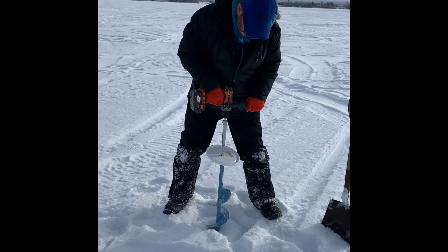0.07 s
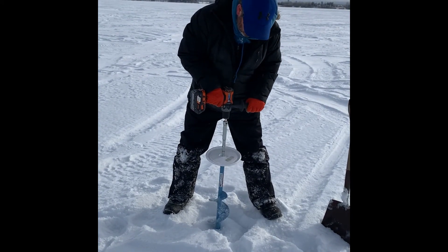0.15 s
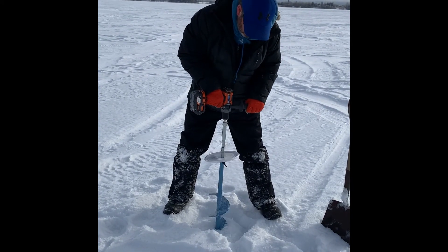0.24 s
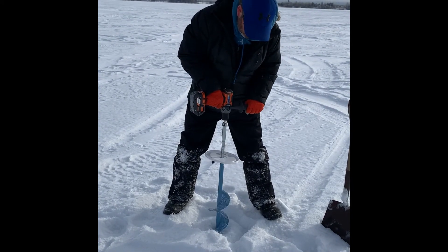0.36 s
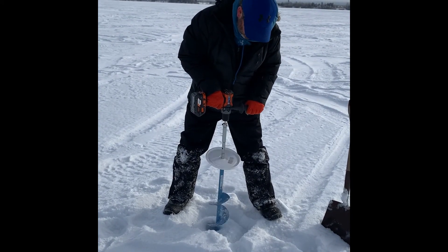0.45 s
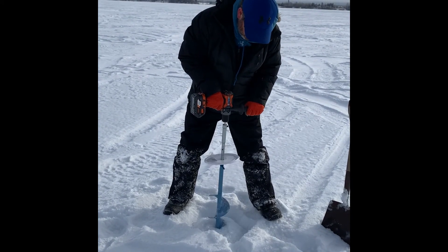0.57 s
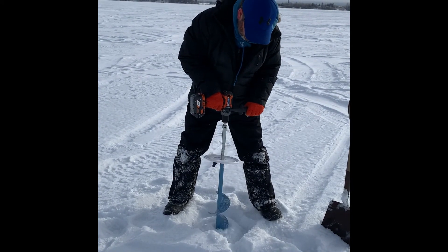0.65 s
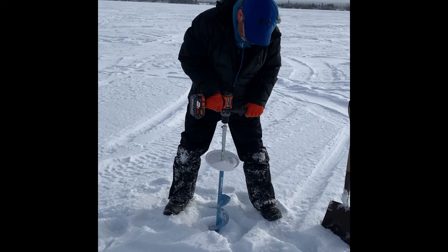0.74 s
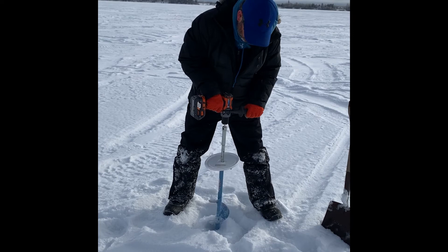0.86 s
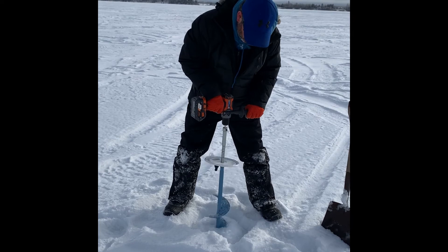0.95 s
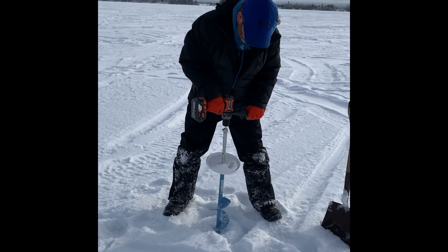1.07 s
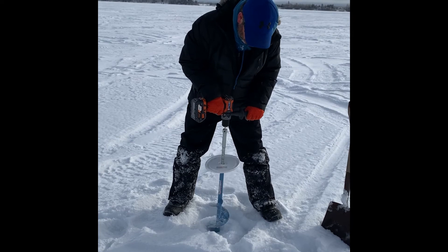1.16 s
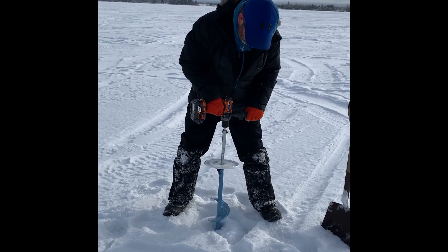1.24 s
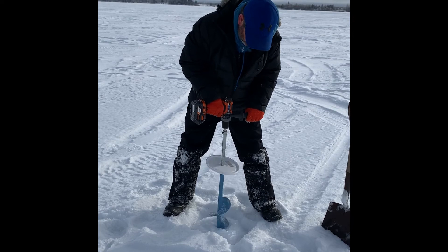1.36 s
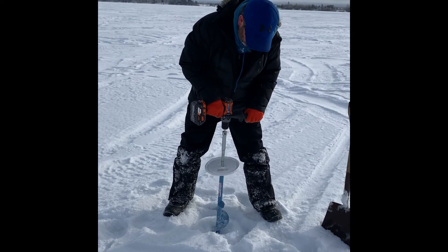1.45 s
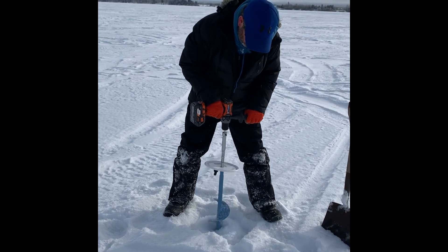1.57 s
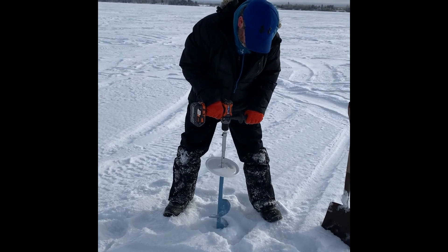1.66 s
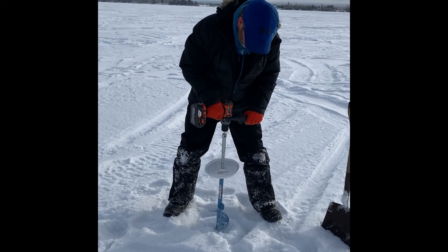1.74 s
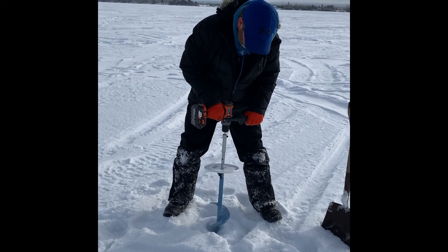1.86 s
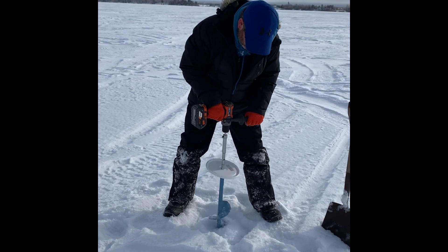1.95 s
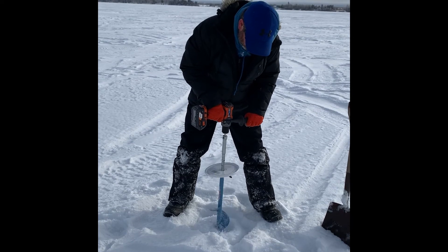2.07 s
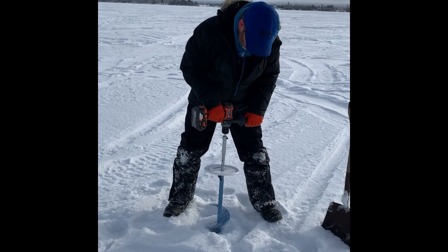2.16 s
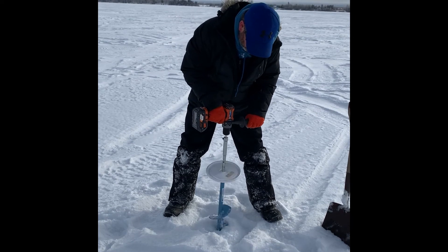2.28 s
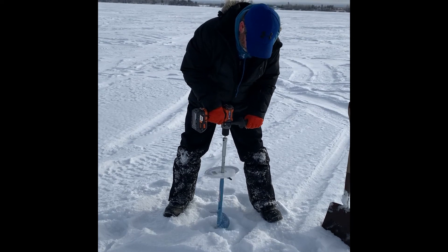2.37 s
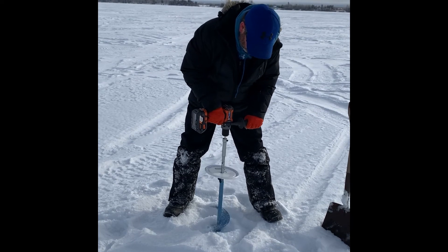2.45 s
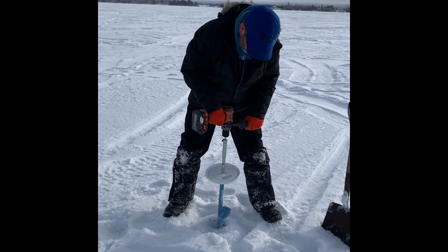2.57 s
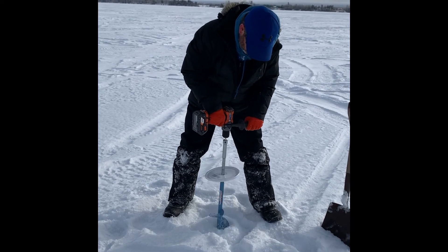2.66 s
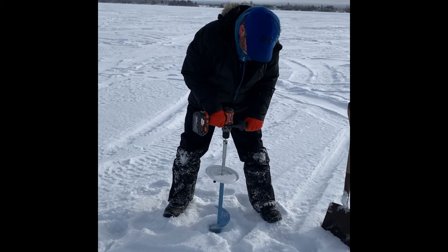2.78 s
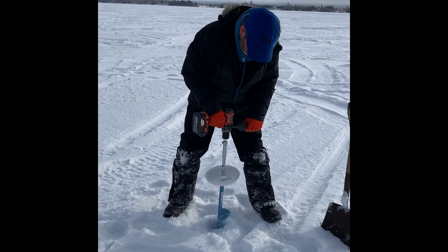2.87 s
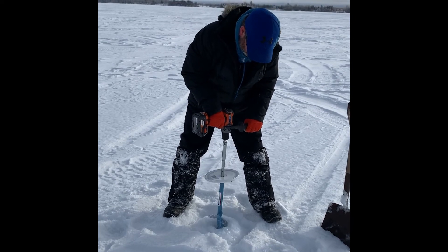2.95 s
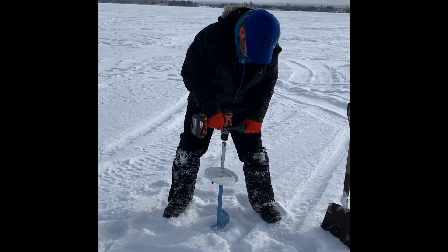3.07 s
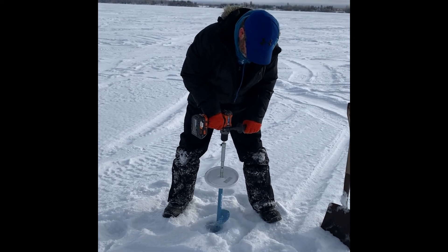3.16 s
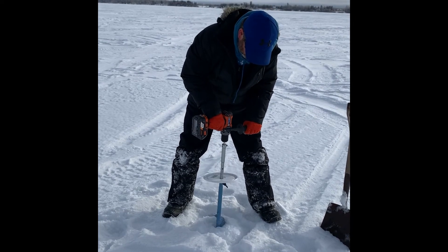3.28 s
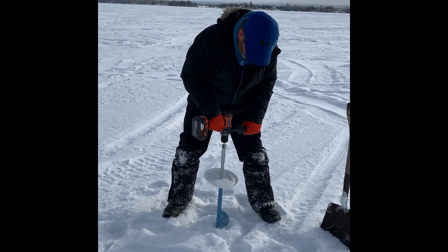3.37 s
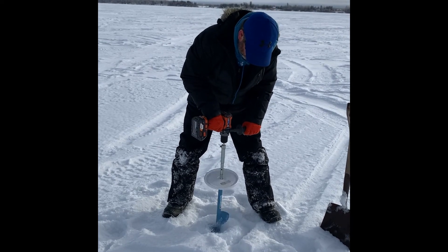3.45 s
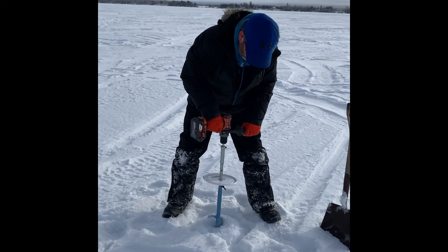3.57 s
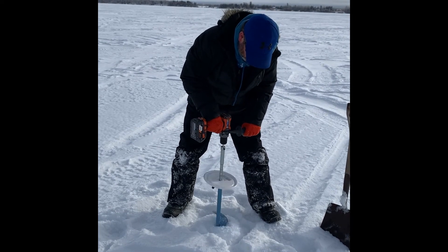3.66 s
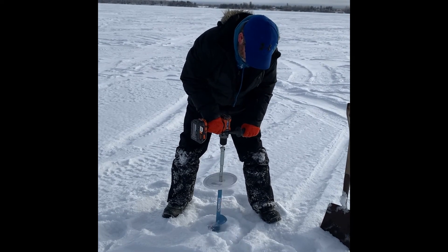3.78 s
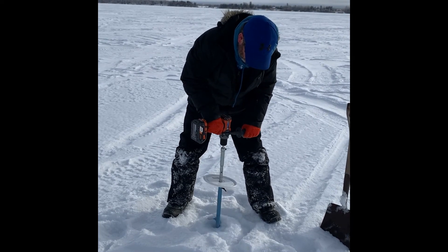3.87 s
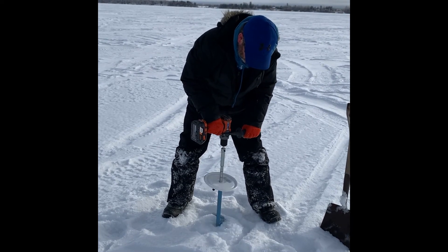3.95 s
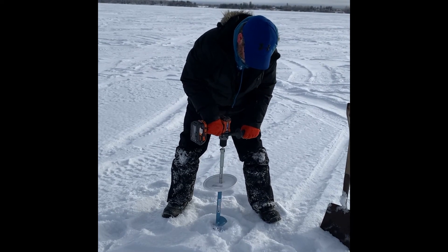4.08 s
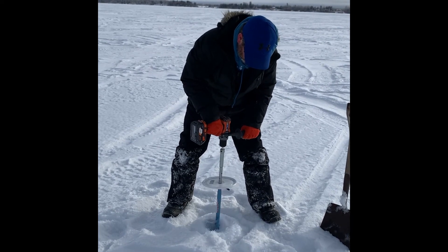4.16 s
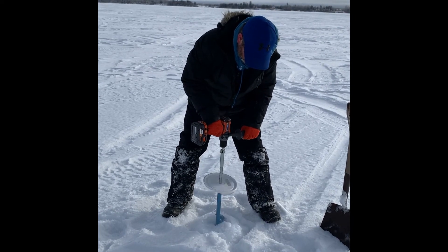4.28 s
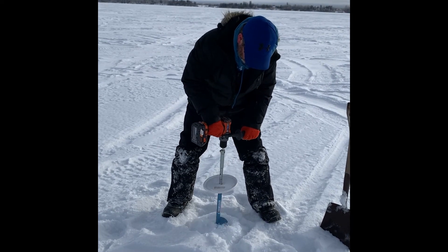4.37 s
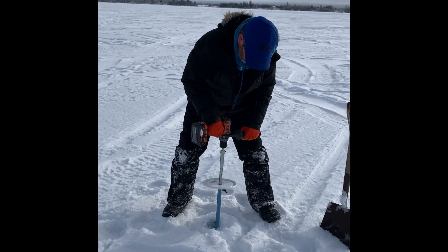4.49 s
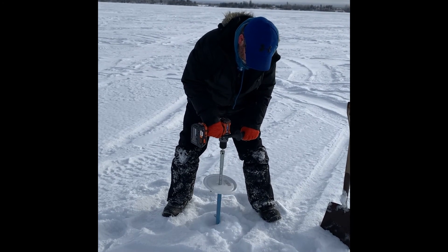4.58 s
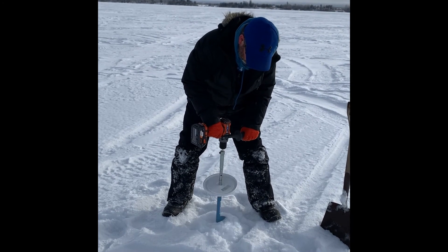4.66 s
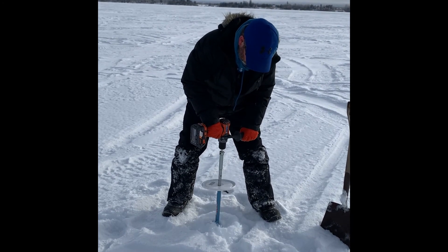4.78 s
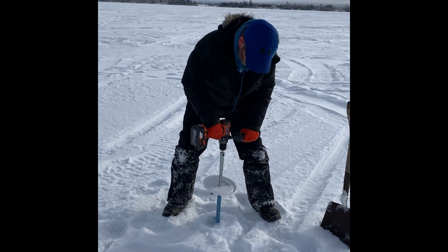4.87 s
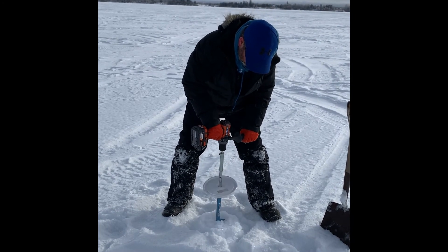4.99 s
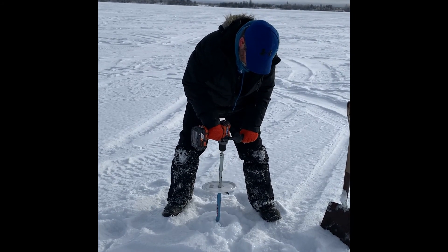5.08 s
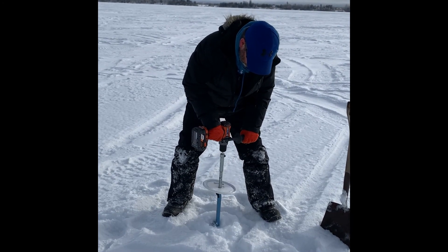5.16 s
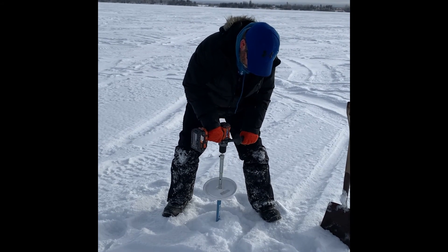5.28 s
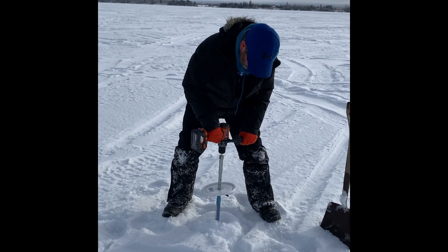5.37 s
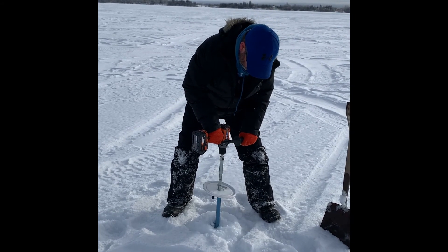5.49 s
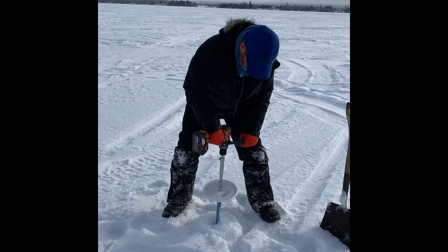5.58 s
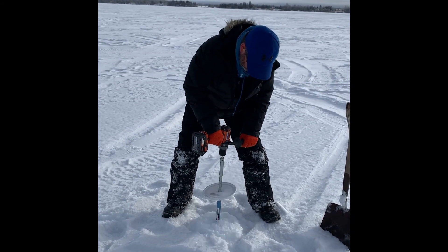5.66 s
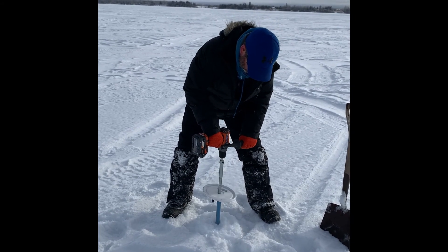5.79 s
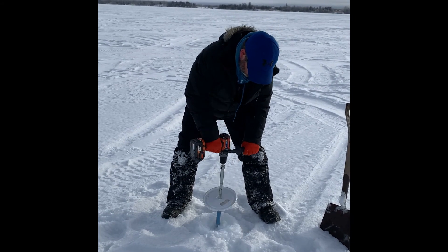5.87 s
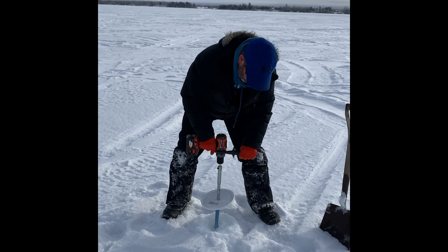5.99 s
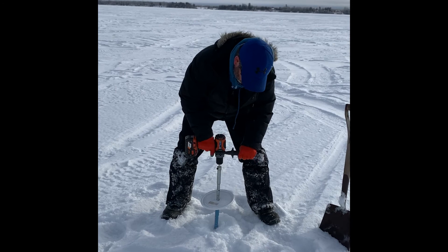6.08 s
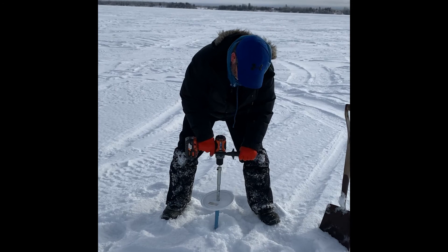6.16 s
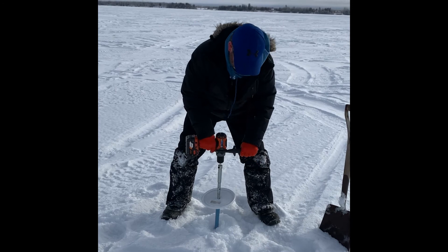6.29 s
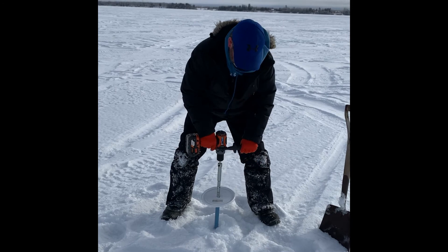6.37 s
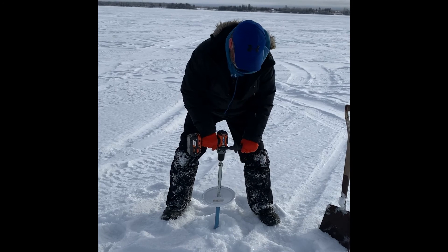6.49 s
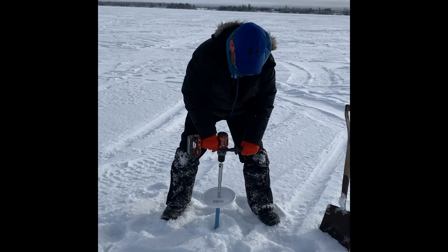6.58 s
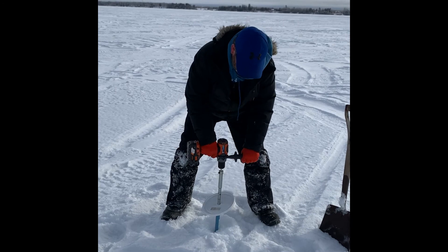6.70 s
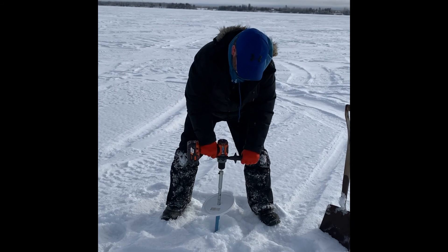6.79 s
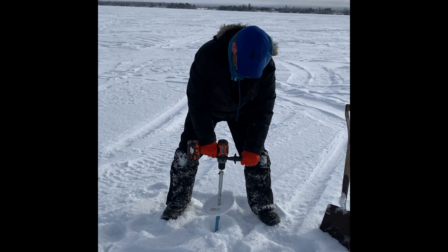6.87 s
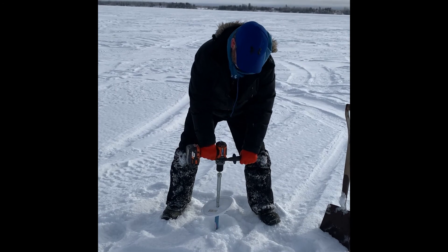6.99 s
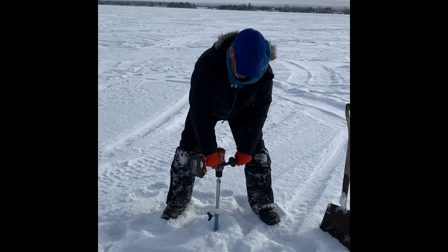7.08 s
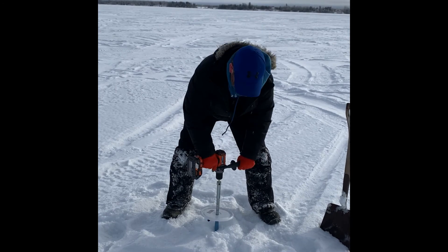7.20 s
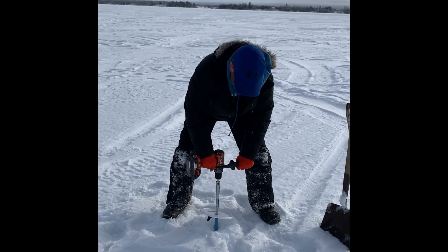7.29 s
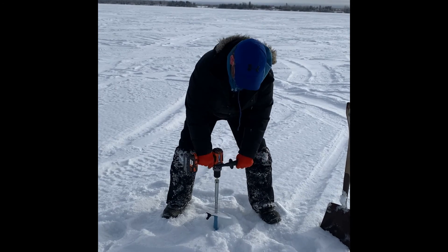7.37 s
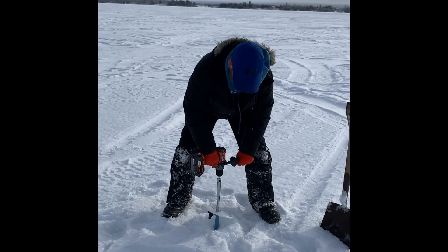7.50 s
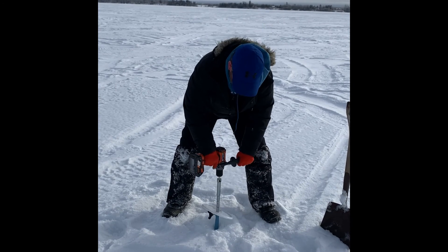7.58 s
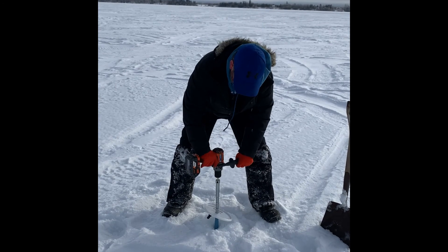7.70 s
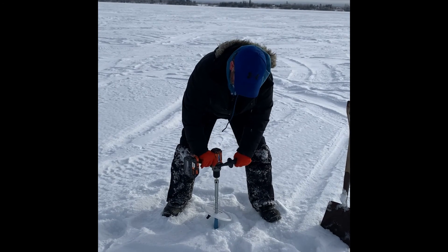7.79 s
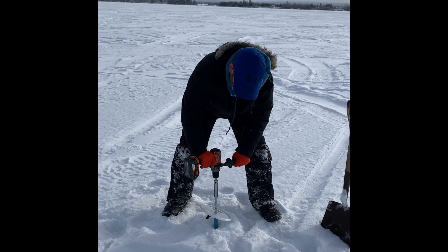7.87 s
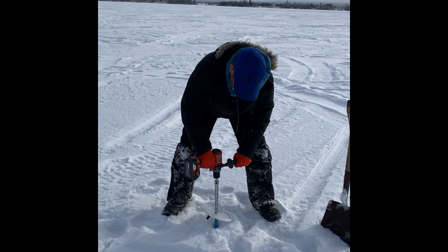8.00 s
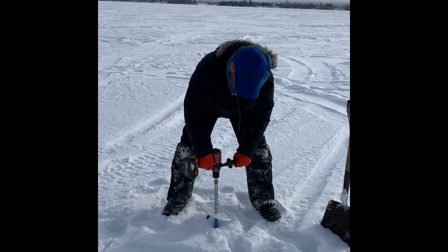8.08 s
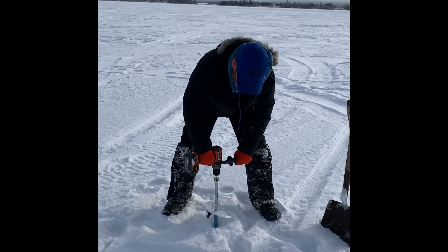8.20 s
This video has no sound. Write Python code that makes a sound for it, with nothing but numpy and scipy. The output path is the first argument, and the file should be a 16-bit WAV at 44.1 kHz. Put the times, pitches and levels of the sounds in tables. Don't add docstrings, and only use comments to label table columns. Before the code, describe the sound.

Outdoors on a snowy frozen lake, heard in dry stereo by a phone a short way off. From 0 to 5.85 s a cordless drill bores an auger through ice: a loud, rough gear whine around 3 kHz, rising slightly near 1.7 s and dipping in quick jerks as blades catch. Broad hiss, grating ice shaving and a thin high whistle surround it; the cutting slowly softens while low rumble from the ice sheet grows. At 5.85 s it breaks through, and the motor brakes to a stop by 6 s with rattles and cracks. Then quiet: knocks, scrapes and wet-sounding crunches around 6.3 and 6.7-6.85 s. At 7.0-7.22 s a short squeeze chirps, whirrs up and down, with a sharp metallic clack near 7.11. Small ticks and snow crunches follow, a clear knock at 7.94, then faint taps to about 8.2 s. Faint low wind buffets throughout.

```python
import sys
import numpy as np
from scipy import signal
from scipy.fft import rfft, irfft, next_fast_len
from scipy.io import wavfile
from scipy.ndimage import uniform_filter1d, map_coordinates

SR = 44100
rng = np.random.default_rng(int(sys.argv[2]) if len(sys.argv) > 2 else 0)


def nominal_scale(level):
    x = np.asarray(level, float) / 20
    return 10 ** x


def to_wav(sig):
    pcm = np.clip(np.atleast_2d(sig), -1, 1) * 32767
    pcm = np.round(pcm).astype(np.int16)
    wavfile.write(sys.argv[1], SR, pcm.T)


N = 363384
FREE_S = 6.5


def unit(x):
    return x / np.sqrt(np.mean(x ** 2) + 1e-20)


def along(points, hz):
    f, v = np.transpose(points)
    return np.interp(np.log(hz + 1), np.log(f + 1), v)


def curves(rows):
    s, *cols = np.transpose(rows)
    return [np.interp(np.arange(N) / SR, s, c) for c in cols]


def wobble(rate):
    knots = rng.standard_normal(int(N * rate / SR) + 4)
    return map_coordinates(knots, [np.arange(N) * rate / SR])


def swell(peak_s, fall_s, rise_share):
    t = np.arange(N) / SR - peak_s
    return np.exp(-np.log(10) / max(fall_s, .004) * np.where(t > 0, t, -t / max(rise_share, .05)))


def filtered(x, response):
    m = next_fast_len(N + SR // 2)
    return irfft(rfft(x, m) * response(np.fft.rfftfreq(m, 1 / SR)), m)[..., :N]


def rush(spectrum, grit_db, rate):
    lumpy = rng.standard_normal(N) * nominal_scale(grit_db * wobble(rate))
    return unit(filtered(lumpy, lambda hz: nominal_scale(along(spectrum, hz))))


def patchy(x, depth_db, size):
    z = signal.stft(x, nperseg=512)[2]
    field = uniform_filter1d(rng.standard_normal(z.shape), size[0], 0)
    field = uniform_filter1d(field, size[1], 1)
    return signal.istft(z * nominal_scale(depth_db * unit(field)), nperseg=512)[1][:N]


def tone(turns, rough):
    return unit(nominal_scale(2.2 * wobble(75)) * np.sin(turns + rough * wobble(200)))


def drill():
    # frequency in Hz, level in dB.
    hiss_spectrum = [(1500, -30), (2600, -4), (3600, .5), (4300, -.5), (4700, 1), (5400, -1.5),
                     (6300, -2.5), (7500, -6), (8400, -3.5), (9200, -6.5), (10300, -5), (11000, -9),
                     (13000, -11), (16000, -14.5)]
    grind_spectrum = [(90, -33), (150, 0.5), (230, 0), (380, -4), (500, -6.5), (1000, -6), (2000, -38)]
    boom_spectrum = [(30, -29.5), (65, -4), (110, 1), (150, -2.5), (220, -31)]
    mesh_hz, mesh_db, (hiss_db, cut_db, grind_db, boom_db) = work()
    mesh_hz = mesh_hz * (1 + .001 * wobble(8) + .002 * wobble(21))
    mesh_db = mesh_db + .6 * wobble(9)
    free_db = 11 * (np.arange(N) > FREE_S * SR)
    mesh_hz = mesh_hz * (1 + nominal_scale(-free_db / 2) * (.009 * wobble(52) + .003 * wobble(110)))
    turns = 2 * np.pi * np.cumsum(mesh_hz) / SR
    beat = 1 + .2 * np.cos(turns / 40)
    turns = turns + .5 * np.sin(turns / 40 + .8 * np.sin(turns / 40))
    pinion = np.maximum(np.cos(turns / 100), 0) ** 3
    gears = gear_tones(turns, mesh_db, hiss_db, free_db)
    hiss_gain = nominal_scale(hiss_db + 1.5 * pinion - free_db / 4 + 0.99 * wobble(15))
    hiss = hiss_gain * rush(hiss_spectrum, grit_db=-0.5, rate=260)
    blades = cutting(turns, cut_db, pinion)
    grind = nominal_scale(grind_db + 3) * rush(grind_spectrum, grit_db=1.2, rate=44)
    boom = nominal_scale(boom_db + 3) * rush(boom_spectrum, grit_db=0, rate=20)
    return beat * gears + hiss + blades + slack_gears() + grind + boom


def work():
    # time in seconds, tooth mesh in Hz, mesh tone in dB.
    cut = [(0.0, 3030, -42.5), (0.25, 3046, -42), (0.5, 2947, -46), (0.82, 3050, -41), (1.15, 2970, -41.5),
           (1.45, 3030, -41), (1.68, 3278, -41.5), (2.3, 3253, -38), (2.5, 3280, -39.5),
           (2.84, 3307, -39.5), (3.3, 3322, -43), (3.57, 3290, -43.5), (3.72, 3246, -43.5),
           (4.2, 3235, -42), (4.8, 3125, -41.5), (5.04, 3250, -40.5), (5.4, 3240, -39), (5.78, 3240, -39)]
    # time in seconds, tooth mesh in Hz, mesh tone in dB, effort in dB.
    brake = [
        (5.851, 3334, -42, 0),
        (5.89, 2950, -39, 2),
        (5.91, 2674, -57, 4),
        (5.93, 2200, -60, 0.5),
        (5.95, 1710, -66, -7.5),
        (5.975, 1100, -91, -14),
        (6.0, 980, -100, -24.5),
    ]
    # time in seconds, tooth mesh in Hz, mesh tone in dB, effort in dB.
    squeeze = [
        (7.004, 1100, -88, -50),
        (7.017, 1796, -55, -39),
        (7.035, 2200, -50, -28.5),
        (7.075, 2990, -53.5, -30),
        (7.1, 3118, -50, -26),
        (7.122, 2847, -42.5, -28),
        (7.15, 2765, -41, -28),
        (7.2, 2396, -48, -32),
        (7.225, 2000, -100, -49.5),
    ]
    # time in seconds, mesh drop in Hz.
    snags = [(.15, 90), (.47, 90), (.8, 60), (1.06, 130), (1.3, 60), (2.15, 80), (2.41, 170), (2.51, 230),
             (2.58, 140), (2.69, 150), (3.36, 100), (3.54, 190), (3.63, 100), (3.71, 100), (3.84, 140),
             (3.92, 150), (4.01, 130), (4.17, 200), (4.235, 190), (4.37, 100), (4.44, 110), (4.5, 170),
             (4.6, 70), (4.72, 150), (4.81, 150), (4.85, 130), (4.98, 140), (5.09, 140), (5.14, 210),
             (5.2, 110), (5.27, 70), (5.47, 150), (5.55, 130), (5.6, 180), (5.73, 120)]
    # dB at the surface, dB at the hole bottom, bend of the change,
    # dB under the effort running free, dB per octave of free speed.
    layers = [
        (-28.5, -33, 0.93, 0.1, 0),
        (-27.5, -33.5, 0.65, -11, 9),
        (-45, -47, 0.7, -21, 18),
        (-65.5, -47.5, 0.49, -26, 21),
    ]
    t, through_s = np.arange(N) / SR, 5.85
    mesh_hz, mesh_db = curves(cut + [r[:3] for r in brake + squeeze])
    still = [(brake[-1][0] + .02, 0, 0, -120), (squeeze[0][0] - .003, 0, 0, -120)]
    end = [(squeeze[-1][0] + .02, 0, 0, -120)]
    effort_db = curves(brake + still + squeeze + end)[2]
    sag_hz = sum(drop_hz * swell(s, .09, .6) for s, drop_hz in snags)
    mesh_hz = mesh_hz - sag_hz
    mesh_db = mesh_db + 2.5 * sag_hz / 100
    depth = np.minimum(t / through_s, 1)
    octaves = np.log2(mesh_hz / 3000)
    levels = []
    for top, bottom, bend, free, slope in layers:
        boring_db = top + (bottom - top) * depth ** bend + 0.5 * wobble(3.31)
        levels.append(effort_db + np.where(t < FREE_S, boring_db, free + slope * octaves))
    return mesh_hz, mesh_db, levels


def gear_tones(turns, mesh_db, hiss_db, free_db):
    # time in seconds, level in dB.
    side_order = [
        (0, -45),
        (1.8, -38),
        (2.2, -37.5),
        (3.7, -36.5),
        (4.2, -42),
        (5.85, -42),
        (5.9, -100),
    ]
    mesh = nominal_scale(mesh_db + 6) * tone(turns, 0.38)
    side = nominal_scale(curves(side_order)[0] + 3) * tone(.808 * turns, 0.24)
    second_gain = np.sqrt(nominal_scale(hiss_db + mesh_db - 11.5 + free_db))
    second = second_gain * (tone(2 * turns, .45) + .4 * tone(1.49 * turns, .8))
    return mesh + side + second


def cutting(turns, cut_db, pinion):
    # time in seconds, shaving dB, half-speed order dB, quarter-speed order dB.
    surges = [(.07, 3, 5, 0), (.43, 0, 1, -1), (.72, 3, 3, 0), (.97, 2, 3, 1), (1.25, -2, -2, -3),
              (1.52, 2, 4, 2), (1.95, 2, 1, 5), (2.1, 2, 0, 0), (2.45, 2, 6, 2), (2.75, 1, 5, 1),
              (3.0, 0, 3, 1), (3.15, 0, 2, 4), (3.35, 0, 4, 3), (3.85, 1, 4, 2), (4.05, 2, 5, 2),
              (4.4, 1, 3, 3), (4.7, 0, 3, 6), (4.95, -1, 2, 3), (5.05, 3, 3, 3), (5.2, 0, 0, 5),
              (5.3, 0, 1, 7), (5.55, 0, -2, 5), (5.84, 1, 4, 2)]
    # multiple of the mesh, dB under the cutting, gain in dB a second.
    load_orders = [
        (.512, -8, .1),
        (.245, -20, 1.5),
    ]
    t = np.arange(N) / SR
    swells = np.array([swell(s, .12, .8) for s, *_ in surges])
    surge_db, *order_db = np.transpose(surges)[1:] @ swells
    orders = 0
    for (k, db, grow_db), more_db in zip(load_orders, order_db):
        order_gain = nominal_scale(db + grow_db * t + more_db + 2.6 * wobble(22))
        orders = orders + order_gain * tone(k * (turns + 2.2 * wobble(30)), 0.4)
    biting = np.clip((5.85 - t) / .03, 0, 1)
    raw = rng.standard_normal(N) * nominal_scale(.9 * wobble(200))
    shaving = unit(patchy(filtered(raw, shell), depth_db=1.3, size=(4, 5)))
    bite_db = surge_db + .6 * wobble(14) + .6 * wobble(45) + 1.5 * pinion
    return biting * nominal_scale(cut_db) * orders + nominal_scale(cut_db - 1.16 + bite_db) * shaving


def shell(f):
    # centre in Hz, width in Hz, level in dB.
    modes = [(627, 120, -11), (775, 110, -1), (880, 110, -11), (1255, 290, -3), (1646, 300, -2),
             (2170, 380, -2.5), (2497, 47, -2), (3180, 360, -6)]
    return np.sqrt(sum(nominal_scale(2 * db) / (1 + (2 * (f - c) / w) ** 2) ** 2 for c, w, db in modes))


def slack_gears():
    # peak in seconds, frequency in Hz, glide in Hz a second, level in dB, seconds to fall 20 dB.
    rattles = [(7.029, 2950, 22000, -33, .013), (7.038, 3500, 15000, -37, .01),
               (7.05, 2700, -3000, -41, .01), (7.075, 2450, 9000, -38, .025),
               (7.07, 5900, 30000, -42, .015), (7.18, 2150, -25000, -39, .01), (7.21, 1700, 0, -47, .012),
               (7.135, 2240, -2100, -38, .03), (7.165, 2170, -2100, -39, .022),
               (7.186, 3050, -3000, -33, .01), (7.212, 1950, 0, -46, .01), (7.055, 400, 0, -48, .03),
               (7.088, 420, -2000, -46, .018), (7.125, 730, 1000, -45, .03),
               (7.116, 1200, -2000, -43, .018), (7.05, 1270, 0, -49, .015), (7.175, 620, -300, -45, .045),
               (7.21, 1130, 1000, -53, .025), (5.84, 1750, 0, -41, .03), (5.862, 3250, -3000, -33, .014),
               (5.877, 3150, -9000, -38, .01), (7.145, 2820, -2500, -38, .035),
               (7.15, 5650, -8000, -41, .03), (5.908, 1350, 0, -36, .01), (5.87, 770, 0, -40, .05),
               (5.925, 1600, 0, -39, .035), (5.925, 2950, -2000, -41, .03), (5.94, 270, 4000, -42, .03),
               (5.947, 600, -1000, -35, .025), (5.985, 600, 3000, -48, .02)]
    t, chatter = np.arange(N) / SR, 0.7 * wobble(220)
    out = np.zeros(N)
    for s, hz, glide, db, fall_s in rattles:
        late = t - s
        gain = nominal_scale(db + 6) * nominal_scale(-20 * np.minimum((late / fall_s) ** 2, 9))
        out += gain * np.sin(2 * np.pi * (hz + glide / 2 * late) * late + chatter)
    return out


def electronics():
    # time in seconds, frequency in Hz, level in dB.
    chirp = [
        (5.92, 10650, -100),
        (7.0, 9900, -100),
        (7.005, 10100, -40.5),
        (7.03, 10670, -44),
        (7.04, 10700, -100),
    ]
    t = np.arange(N) / SR
    chirp_hz, chirp_db = curves(chirp)
    running = t < chirp[0][0]
    hz = np.where(running, 10625 + 8 * t + 12 * wobble(2.5), chirp_hz)
    db = np.where(running, -46 - 2.5 * t + 3 * wobble(2.7), chirp_db)
    return nominal_scale(db + 1 + 3 * wobble(10)) * np.sin(2 * np.pi * np.cumsum(hz) / SR + .9 * wobble(60))


def knocks():
    # time in seconds, peak in dB, low part in dB, high part in dB.
    contacts = [(5.9016, -15.5, -9.5, -11), (5.9179, -20.5, -15, -8), (5.957, -25, -12, 0),
                (5.9882, -38, 5, 4), (6.0454, -31.5, 1.5, 2), (6.2935, -37, -10, -8), (6.3075, -35, -5, 3),
                (6.331, -49, -8, -6), (6.466, -54, -10, -3), (6.3815, -49, 4, -7.5), (6.4125, -39, -8, -2),
                (6.6673, -53, 6, -19), (6.6882, -30, -13, -3), (6.7765, -41, 3, -5), (6.7835, -40, 3, -6),
                (6.8038, -43, 2, 2), (6.8075, -42, 4, 0), (6.8435, -35, 2, 5), (7.1135, -21, -8, 4),
                (7.1158, -18.5, -10, 2), (7.279, -42, -2, 0), (7.3038, -51, 7, -15), (7.4175, -52, -14, 10),
                (7.4272, -39, -14, 14), (7.4465, -35, -7, -14), (7.493, -42, -4, -4), (7.749, -62, -10, -5),
                (7.4759, -47, -8, -9), (7.772, -55, 0, -4), (7.5786, -49.5, -13, -19),
                (7.6639, -60, 14, -8), (7.7192, -62, -9, 12), (7.889, -55, -11, -12),
                (7.9108, -37, -13, -4), (7.9419, -23.5, -29.5, -5), (8.08, -62, 1, -9),
                (8.1065, -47, -21.5, -20.5), (8.228, -49, 2, -20)]
    crack_t60_s = [.024, .022, .017]
    # time in seconds, frequency in Hz, peak in dB, t60 in seconds.
    rings = [(5.93, 623, -31, 0.1), (5.96, 6920, -34.5, 0.059), (6.046, 1156, -36, 0.13),
             (6.303, 1130, -39.5, 0.07), (7.4925, 15600, -40, .03), (7.418, 6700, -44, .05),
             (7.418, 10600, -46, .04), (7.427, 11700, -36, .015), (8.085, 580, -62, .07),
             (7.913, 560, -58, .12), (6.9, 440, -56, .06), (6.667, 8200, -68, .15), (6.69, 6870, -51, 0.08),
             (6.688, 8100, -44, .03), (6.808, 600, -35, 0.052), (6.845, 1150, -44, .06),
             (6.414, 2000, -48, .03), (6.76, 480, -48, .06), (7.7195, 15000, -54, .02),
             (6.06, 1650, -50, .08), (7.094, 6450, -30, .04), (7.1127, 4220, -7.5, 0.0071),
             (7.1158, 2600, -18, .01), (7.1145, 6600, -24, .02), (6.01, 3100, -48, .05),
             (7.1145, 4080, -16, .025), (7.104, 194, -39, 0.093), (7.225, 110, -46, 0.15)]
    out, t = np.zeros(N + SR), np.arange(SR // 4) / SR
    edges_hz = [(300, 1400), (1500, 5000), (5500, 14000)]
    bands = [signal.butter(2, edge, "band", fs=SR, output="sos") for edge in edges_hz]
    for s, db, low_db, high_db in contacts:
        crack = 0
        for part_db, band, t60 in zip([low_db, 0, high_db], bands, crack_t60_s):
            noise = unit(signal.sosfilt(band, rng.standard_normal(len(t))))
            crack = crack + nominal_scale(part_db - 60 * t / t60) * noise
        out[round(s * SR):][:len(t)] += nominal_scale(db - 2.5) * crack * (1 - np.exp(-t / 0.0005))
    shiver = .8 * wobble(73)
    for s, hz, db, t60 in rings:
        i = round(s * SR)
        phase = 2 * np.pi * hz * t + shiver[i // 2:][:len(t)]
        out[i:][:len(t)] += nominal_scale(db - 60 * t / t60) * np.sin(phase)
    return out[:N]


def sliding():
    # peak in seconds, level in dB, brightness in dB, seconds to fall 20 dB.
    slides = [(6.015, -47.5, -2, 0.09), (6.056, -51, -3, 0.02), (6.1, -62, -9, .1), (6.302, -48, -4, .01),
              (6.311, -47, -8, .01), (6.333, -55, -3, 0.03), (6.392, -59, -18, .02),
              (6.41, -58, -14.5, 0.12), (6.46, -61, -11, 0.15), (6.5, -75.5, -12, 0.6),
              (6.58, -70, -5, -0.1), (6.701, -53, -6, 0.02), (6.73, -57, -4, 0.06), (6.672, -60, -14, .015),
              (6.745, -58, 0, .015), (6.765, -55, -18, .015), (6.785, -46, -15, 0.025),
              (6.797, -51, -15, .015), (6.811, -44, -16, 0.02), (6.825, -52, -16, .015),
              (6.86, -64.5, -15.5, 0.2), (6.9, -64, -9.5, 0.1), (7.21, -52.5, 2.5, .05),
              (7.24, -57, -5.5, 0.06), (7.285, -56, 0, .012), (7.308, -52, -8, .03), (7.34, -62, -5, .03),
              (7.367, -64, 8, .008), (7.397, -62, -8, .012), (7.421, -49, 14, 0.006),
              (7.431, -55, 13, .012), (7.45, -53, -4, .015), (7.475, -54.5, -3.5, 0.03),
              (7.505, -48, -2, 0.05), (7.525, -50, -4, .02), (7.54, -54, -5, 0.01), (7.59, -72, -5, 0.7),
              (7.62, -72, -12, 0.08), (7.77, -67, 10, .012), (7.784, -62, 14, .012), (7.81, -74, 0, .05),
              (7.965, -66, -6, 0.03), (8.085, -70, -11, .04), (8.112, -73, 5, .02), (8.233, -57, -10, 0.01)]
    # level in dB, share of the brightness.
    grains = [
        (-2, 1.0),
        (1.5, 0.27),
        (0, -0.11),
        (-4, -0.44),
    ]
    # frequency in Hz, level in dB.
    fizz_spectrum = [(3500, -21.5), (6500, -0.5), (10000, -2.5), (16000, -21)]
    crunch_spectrum = [(1300, -32.5), (1900, -3.5), (2400, 0), (3500, -3), (5000, -1.5), (9000, -29.5)]
    scrape_spectrum = [(300, -30), (450, -0.5), (750, 7), (1000, -1.5), (1250, -0.5), (1800, -3.5),
                       (2500, -35.5)]
    thud_spectrum = [(60, -25), (110, -3), (270, -11), (400, -2), (600, -25)]
    strokes = np.array([swell(s, fall_s, 0.87) ** 2 for s, _, _, fall_s in slides])
    _, db, bright_db, _ = np.transpose(slides)
    gains = []
    for own_db, share in grains:
        power = nominal_scale(2 * (db + own_db + share * bright_db)) @ strokes
        gains.append(np.sqrt(power + nominal_scale(2 * -87)))
    fizz, crunch, scrape, thud = gains
    clumps = unit(nominal_scale(1.6 * wobble(110) + 1.8 * wobble(400)))
    fine = fizz * rush(fizz_spectrum, grit_db=2, rate=640) + crunch * rush(crunch_spectrum, grit_db=3, rate=300)
    coarse = scrape * rush(scrape_spectrum, grit_db=2.5, rate=170) + thud * rush(thud_spectrum, grit_db=4.5, rate=50)
    return patchy(clumps * (fine + coarse), depth_db=2.5, size=(5, 2))


def open_air():
    # frequency in Hz, level in dB.
    air_spectrum = [(250, -20), (500, -6), (1000, -22), (1700, -3), (4000, -9), (9000, -10), (16000, -15)]
    return nominal_scale(-82 + 2.5 * wobble(9)) * patchy(rush(air_spectrum, grit_db=1.5, rate=10), depth_db=3, size=(7, 7))


def breeze():
    # frequency in Hz, level in dB.
    wind_spectrum = [(15, -60), (27, -36), (40, -8), (58, 2), (72, -2), (81, -0.5), (300, -42),
                     (390, -74.5), (660, -120)]
    # time in seconds, level in dB.
    gusts = [(0, -11), (.55, 5), (.8, -3), (1.0, 5), (1.3, 0.1), (6.1, 2.5), (6.8, -3.5), (6.97, -6.5),
             (7.25, 5.5), (7.6, 0.5), (8.02, 1), (8.2, -5.5)]
    lumps = np.array([rush(wind_spectrum, grit_db=0.5, rate=12), rush(wind_spectrum, grit_db=2, rate=12)])
    shared = rush(wind_spectrum, grit_db=0.5, rate=12)
    return nominal_scale(-65 + curves(gusts)[0]) * (1.15 * shared + 0.55 * lumps)


def ports(x):
    # frequency in Hz, phase in radians by which left leads.
    lead = [(0, 0), (170, -1.1), (400, .4), (700, 1.4), (1000, 1.9), (1300, .8), (1470, -.6), (1900, .3),
            (2150, 1.8), (2460, 3.0), (2620, 2.4), (2950, .1), (3500, 1.4), (4725, 3.14), (8930, 9.42),
            (13200, 15.71), (15300, 18.85)]
    # frequency in Hz, left over right in dB.
    tilt = [(600, .3), (770, -1), (1050, 1), (1370, 4.5), (1550, -.5), (1800, .6), (2070, -3), (2600, 1.5),
            (2850, 5), (3100, -1), (3800, -1), (4200, 0)]
    # frequency in Hz, share of unrelated sound in dB.
    stray_share = [(60, -3), (200, -14), (800, -18), (1300, -9), (2450, -11), (2700, -3), (3100, -10),
                   (4300, -24), (6000, -19), (16000, -18)]
    side = np.array([[.5], [-.5]])
    z = np.abs(signal.stft(x, nperseg=256)[2])
    scatter = np.exp(2j * np.pi * rng.random((2, *z.shape)))
    stray = signal.istft(z * scatter, nperseg=256)[1][:, :N]

    def direct(hz):
        turn = np.exp(1j * side * np.interp(hz, *np.transpose(lead)))
        return nominal_scale(side * along(tilt, hz)) * turn / np.sqrt(1 + nominal_scale(along(stray_share, hz)) ** 2)

    def scattered(hz):
        share = nominal_scale(along(stray_share, hz))
        return 1.4 * share / np.sqrt(1 + share ** 2)

    return filtered(x, direct) + filtered(stray, scattered)


def scene():
    return ports(drill() + electronics() + knocks() + sliding() + open_air()) + breeze()


def low_pass(x):
    return signal.sosfilt(signal.butter(12, 16480, fs=SR, output="sos"), x)


def record(dry):
    top_hz, edge_hz = 15800, 16450
    mix = filtered(dry, lambda hz: np.where(hz < top_hz, 1, nominal_scale(-33) * (hz < edge_hz)))
    return low_pass(mix)


dry = scene()
out = record(dry)
to_wav(out)
```